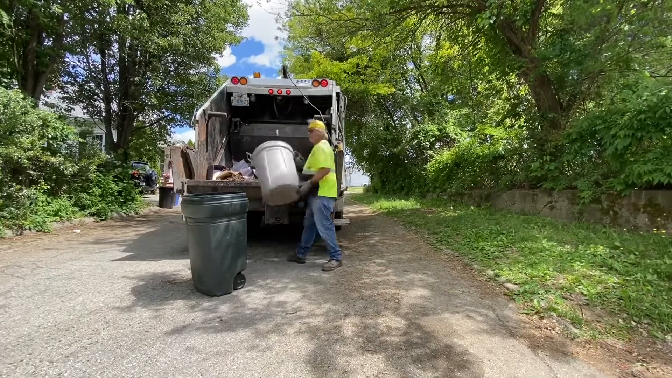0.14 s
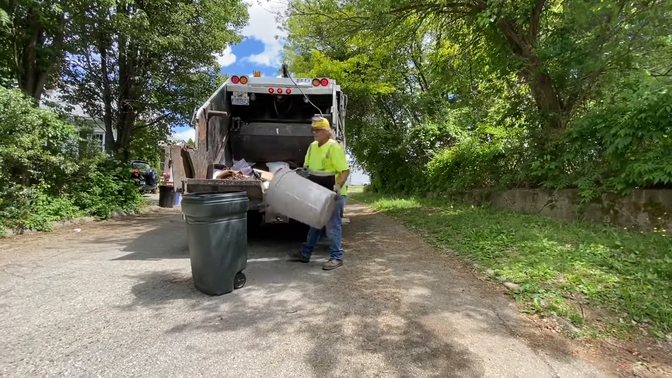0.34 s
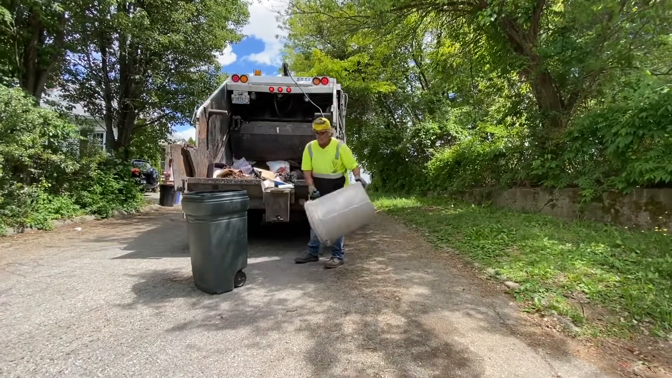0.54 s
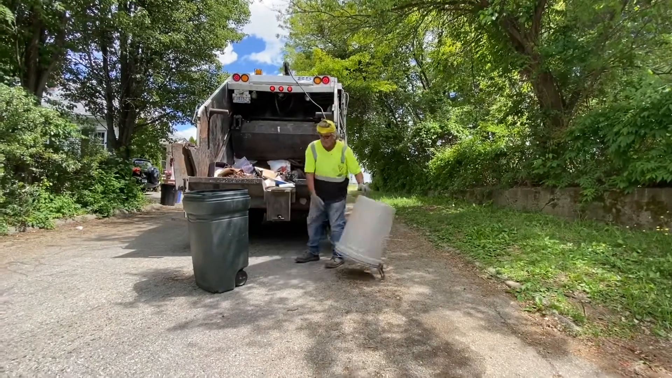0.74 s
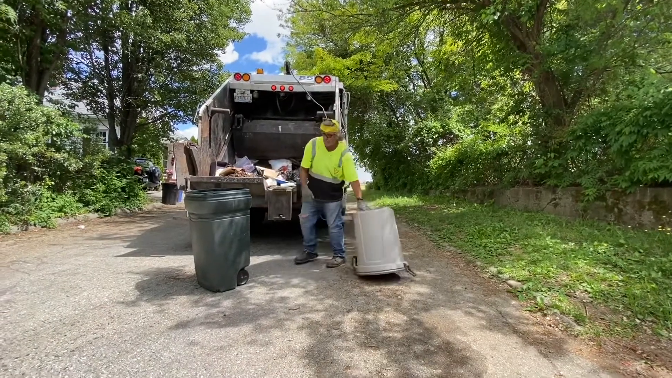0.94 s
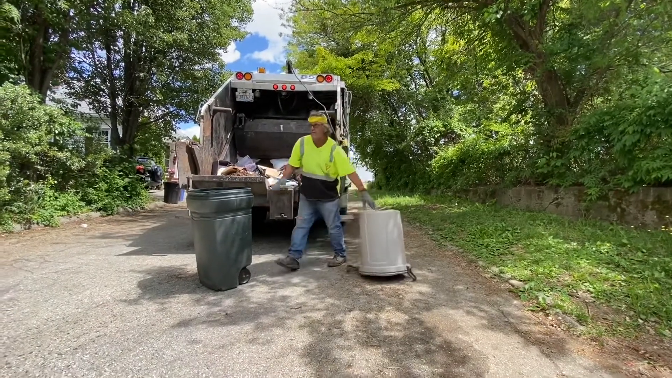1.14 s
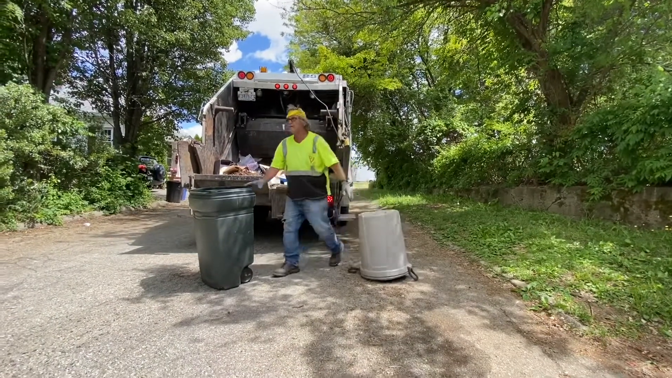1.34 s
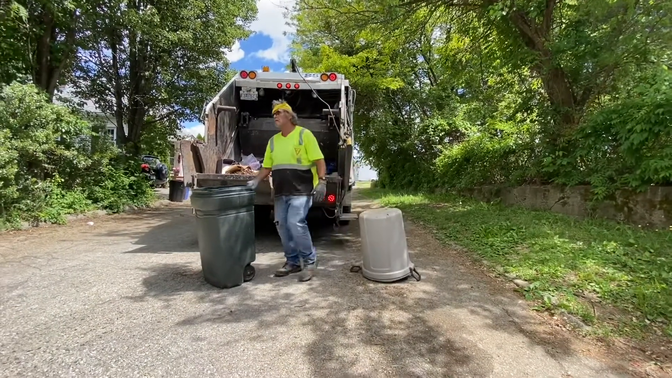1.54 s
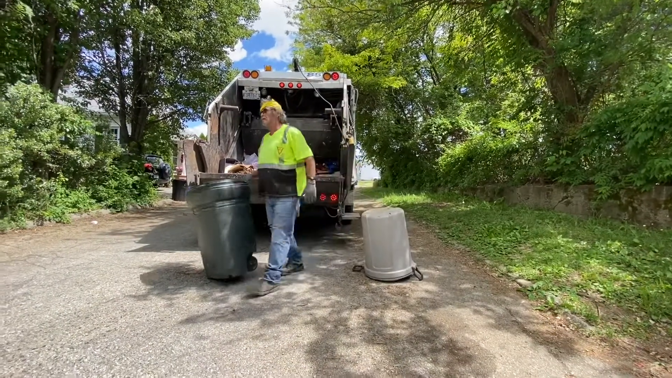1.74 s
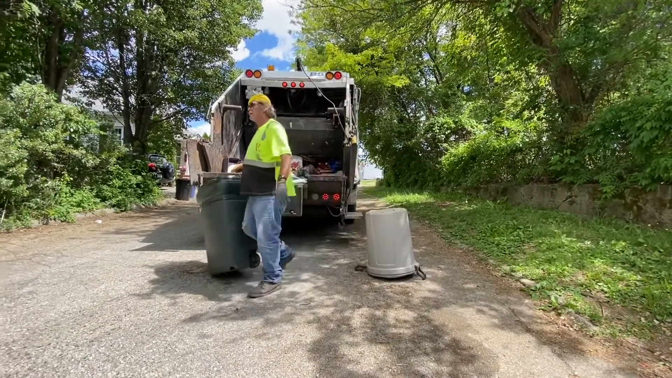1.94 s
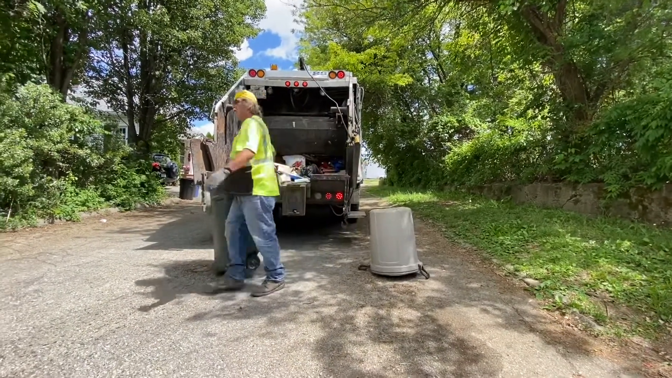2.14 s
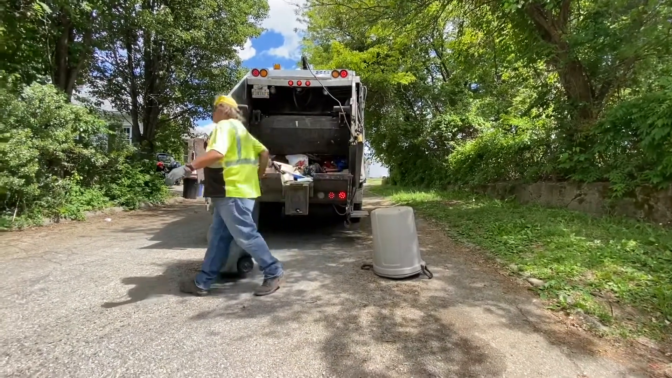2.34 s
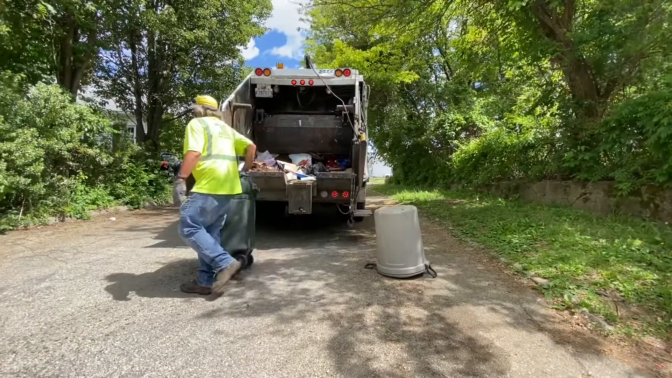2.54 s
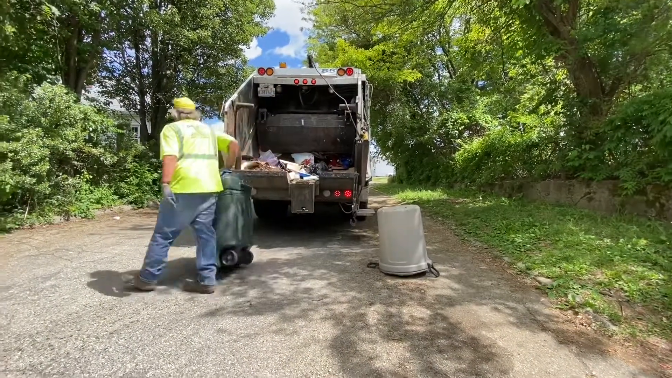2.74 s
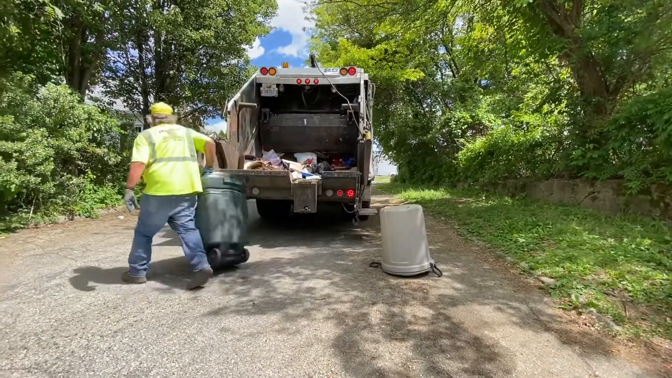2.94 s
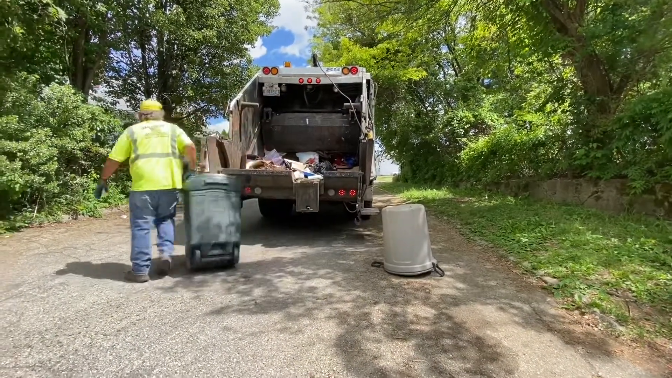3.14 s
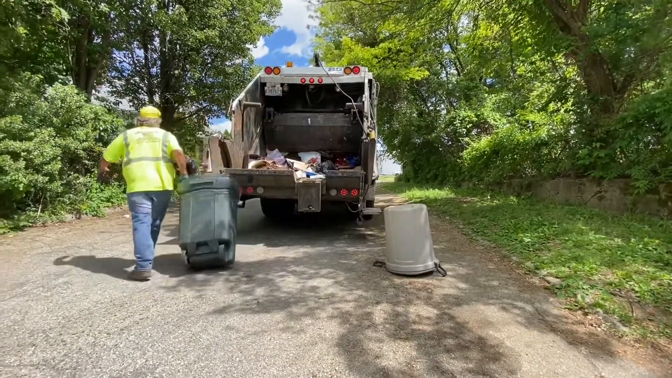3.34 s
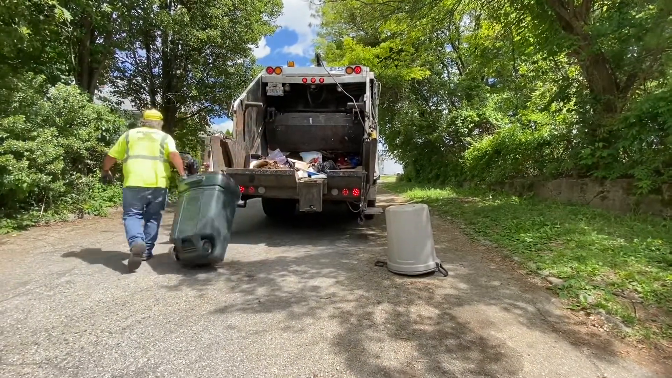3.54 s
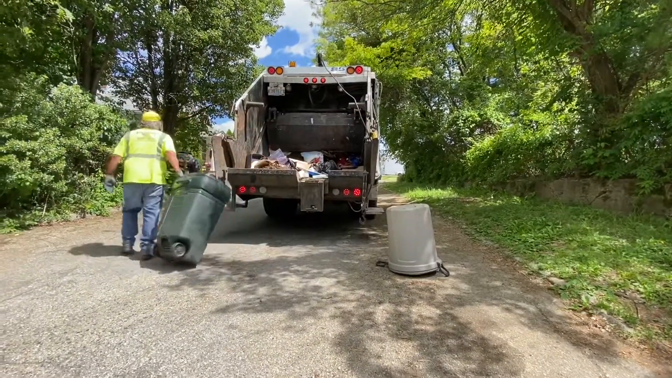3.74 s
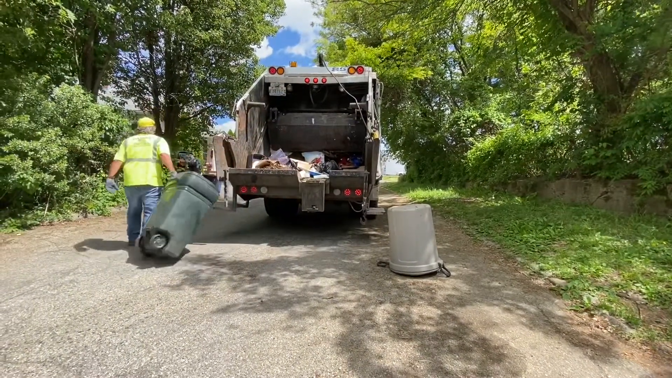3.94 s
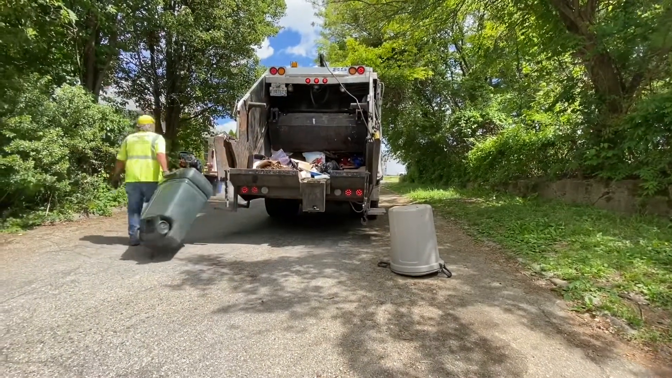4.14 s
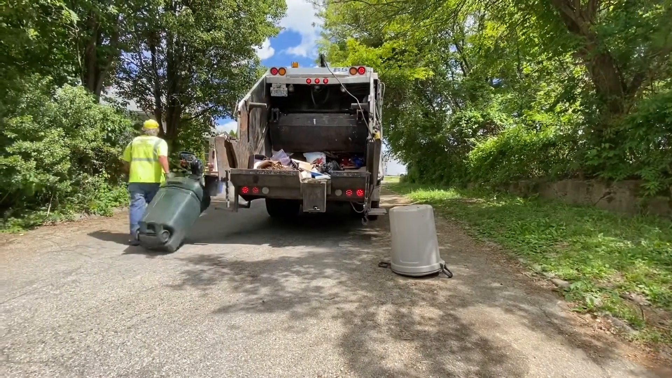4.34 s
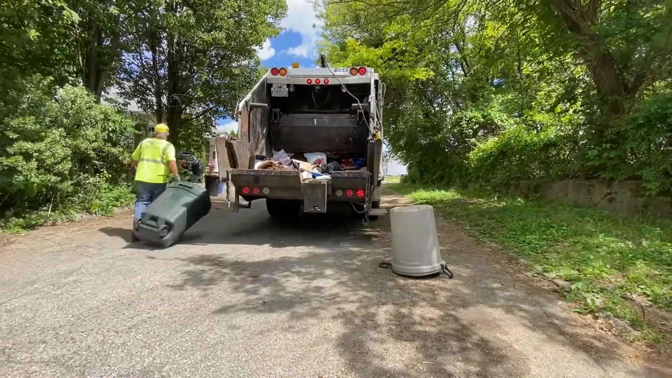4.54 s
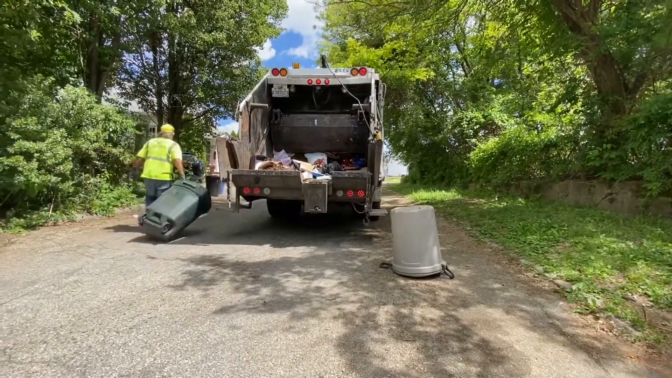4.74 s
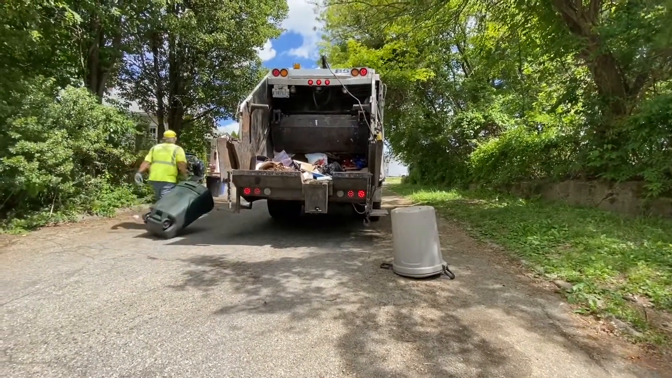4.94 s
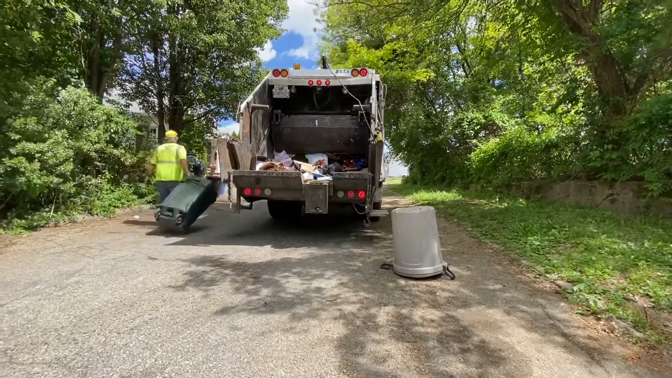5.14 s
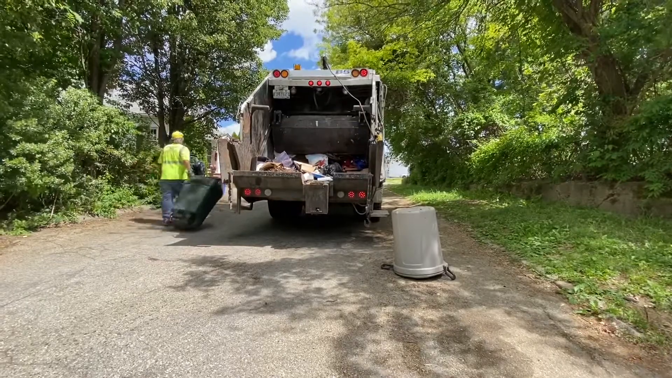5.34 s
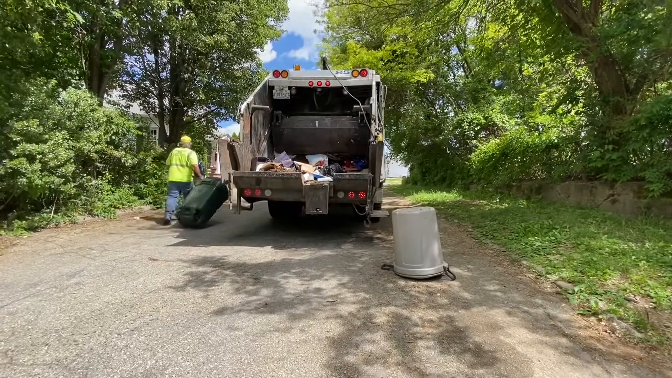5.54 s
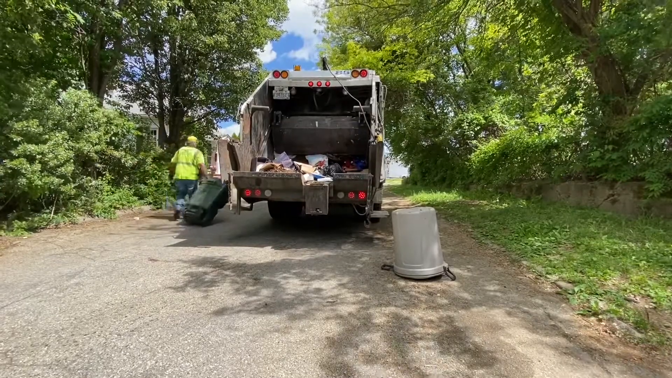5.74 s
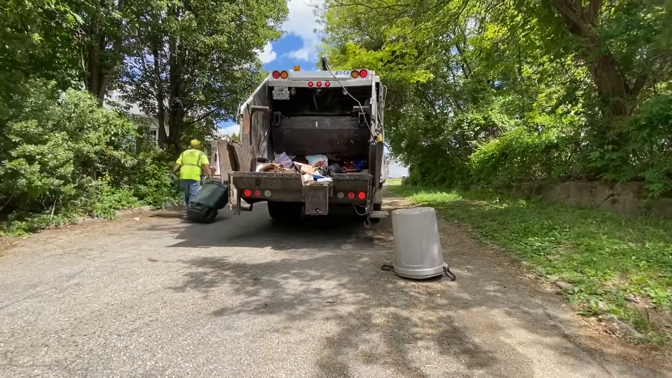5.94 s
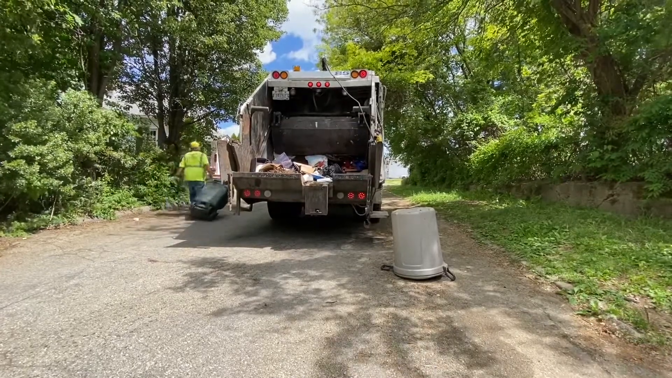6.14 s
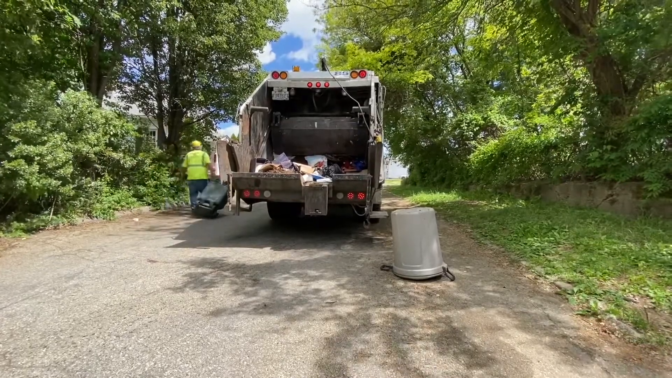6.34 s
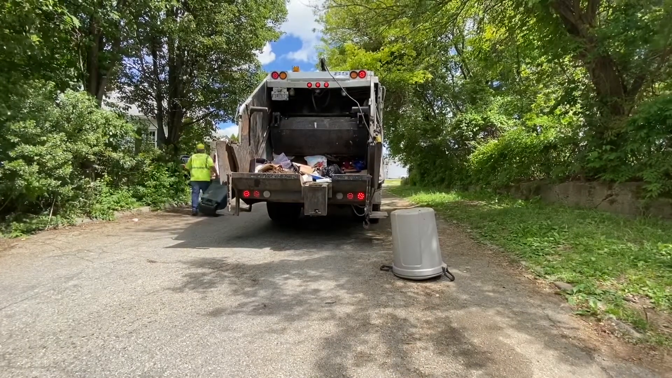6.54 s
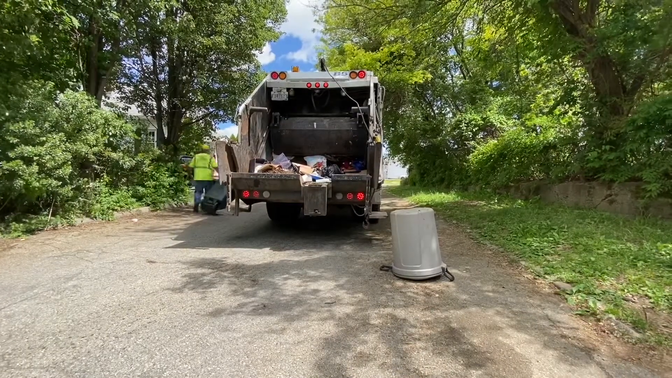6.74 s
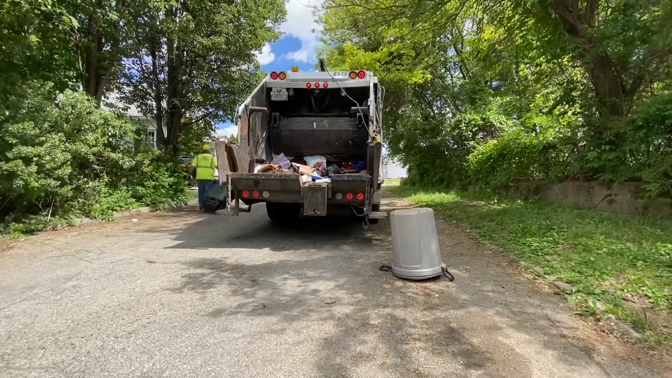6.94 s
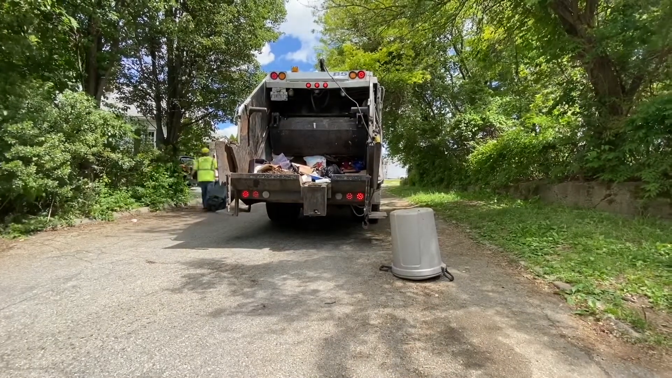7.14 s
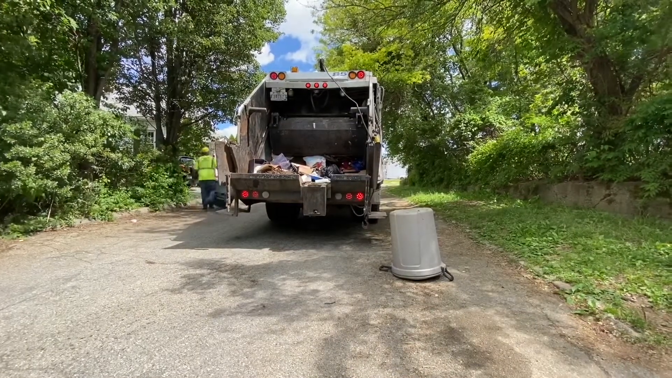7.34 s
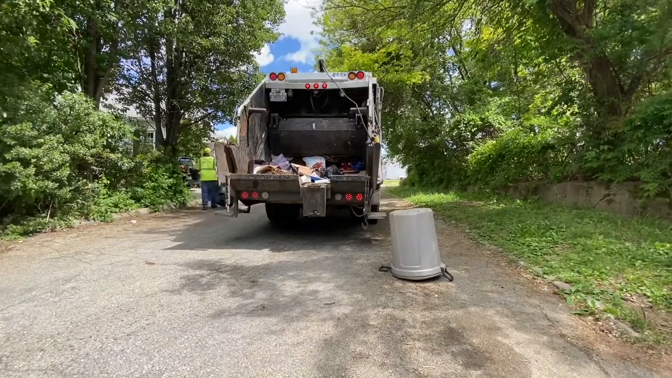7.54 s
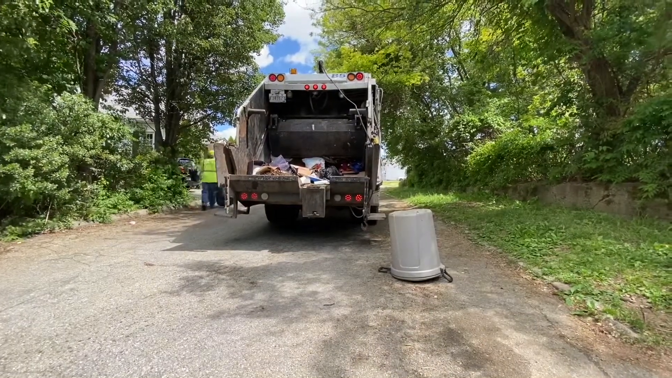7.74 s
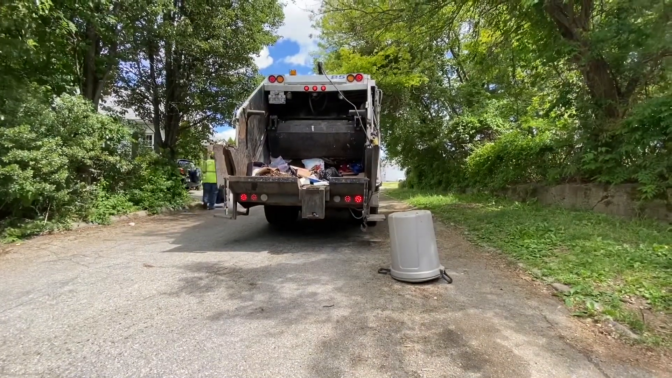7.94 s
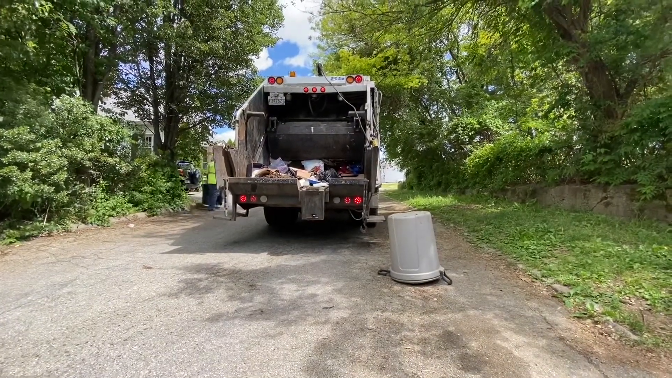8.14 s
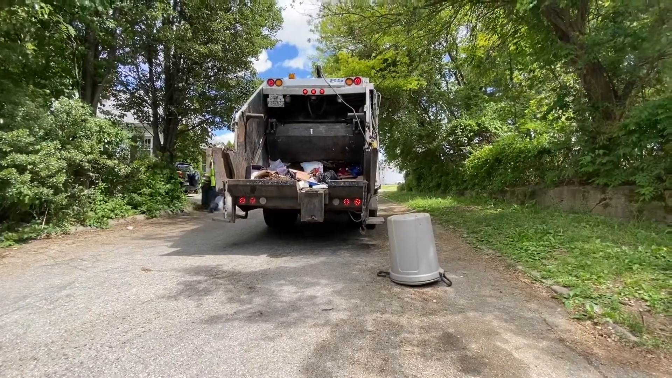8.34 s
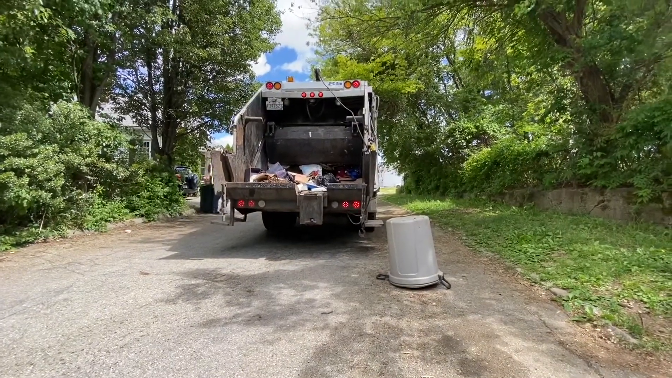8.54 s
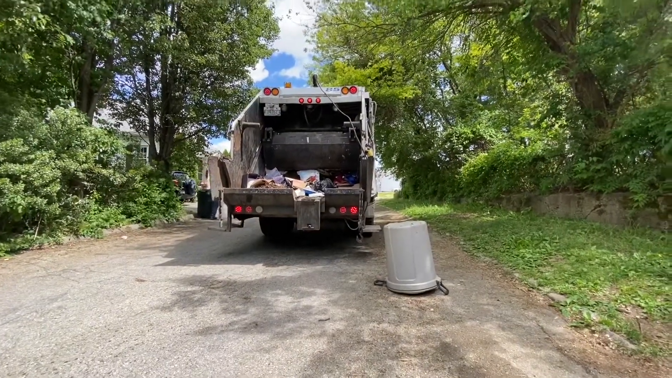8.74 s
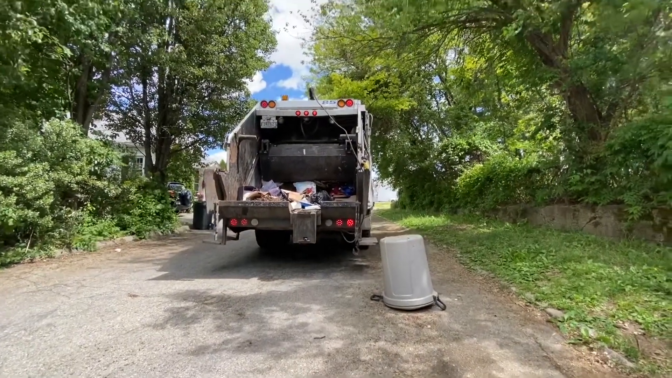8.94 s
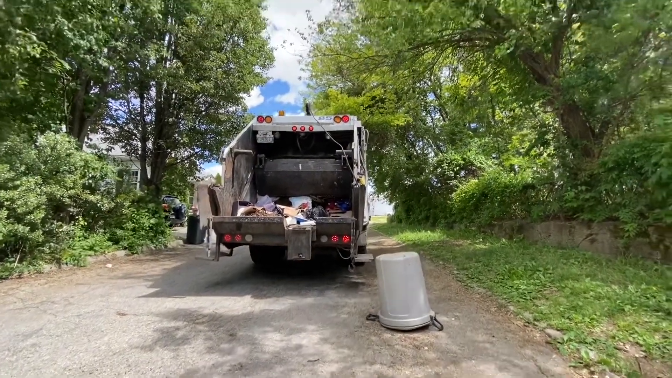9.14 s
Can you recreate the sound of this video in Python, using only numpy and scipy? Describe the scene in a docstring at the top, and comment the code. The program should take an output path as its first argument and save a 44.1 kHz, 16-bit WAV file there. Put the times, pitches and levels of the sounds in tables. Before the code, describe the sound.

Steady truck idle, low pump hum and soft wind rumble run throughout. First a hollow plastic can hits the ground and bounces, loud and close to centre. After light scrapes and grit, a wheeled plastic bin drums and thumps away leftward over rough asphalt, knocks ringing metal near seven seconds, and ends with light lid clacks. Handheld stereo microphone outdoors, short diffuse street echo, low wind thumps.

```python
"""A refuse truck idles in a tree-lined street: diesel knock, fan roar and the hum of its hydraulic pump.
An empty plastic can is dropped and bounces; a wheeled bin is dragged over rough asphalt, bumping,
and knocks the truck's side. Grit and bin give short bright snaps; light wind buffets two microphone ports
over a low rumble. Noise shaped in colour and level makes roar, wind, rumble and grit; sine waves make the
hum, exhaust and low thumps; short pushes of noise ring the resonances of can, bin and truck."""
import sys
import numpy as np
from scipy import signal
from scipy.fft import rfft, irfft, next_fast_len
from scipy.io import wavfile
from scipy.ndimage import map_coordinates

SR = 44100
rng = np.random.default_rng(int(sys.argv[2]) if len(sys.argv) > 2 else 0)


def wav_record(signal):
    """Record a signal, one row per channel, as 16-bit PCM in the file named by sys.argv[1]."""
    frames = np.transpose(np.atleast_2d(signal))
    bounded = np.clip(frames, -1, 1)
    # unit amplitude maps onto the largest positive 16-bit level
    quanta = np.round(bounded * 32767).astype(np.int16)
    wavfile.write(sys.argv[1], SR, quanta)


def nominal_scale(level):
    """Amplitude ratio for a level in decibels (scalar or array-like)."""
    x = np.asarray(level, float) / 20
    return 10 ** x


N = 409248
T = np.arange(N) / SR  # seconds
HALVES = np.array([[.5], [-.5]])  # shares a left-right difference between the two ports


def unit(x):
    """Scales a signal to rms 1."""
    return x / np.sqrt(np.mean(x ** 2) + 1e-20)


def along(points, hz):
    """Reads a curve of (pitch_hz, value) points on a log frequency axis."""
    f, v = np.transpose(points)
    return np.interp(np.log(hz + 1), np.log(f + 1), v)


def curves(rows):
    """One value per sample for each column after the time; -120 (next to silence) outside the rows."""
    s, *cols = np.transpose(rows)
    return [np.interp(T, s, c, left=-120, right=-120) for c in cols]


def wobble(rate):
    """A smooth random curve with rate random points a second."""
    return map_coordinates(rng.standard_normal(int(N * rate / SR) + 4), [T * rate])


def filtered(x, response):
    """Multiplies the spectrum of x by a complex response of frequency."""
    m = next_fast_len(N + SR // 2)
    return irfft(rfft(x, m) * response(np.fft.rfftfreq(m, 1 / SR)), m)[..., :N]


def ringing(modes):
    """Response of a body with (pitch_hz, width_hz, level_db) resonances, of alternating sign."""
    def response(f):
        total = 0
        for k, (centre, width, db) in enumerate(modes):
            resonance = 1j * f * width / (centre * centre - f * f + 1j * f * width)
            total = total + (-1) ** k * nominal_scale(db) * resonance
        return total
    return response


def rush(gain, alike):
    """Stereo noise of rms 1 with a colour and a likeness between channels."""
    def response(hz):
        turn = np.arccos(np.clip(along(alike, hz), -1, 1)) / 2
        return gain(hz) * [np.cos(turn), np.sin(turn)]
    mid, side = filtered(rng.standard_normal((2, N)), response)
    return unit(np.array([mid + side, mid - side]))


def lumps(depth_db):
    """Random swings in level, separate for each port."""
    return nominal_scale(depth_db * np.array([wobble(12), wobble(12)]))


def bursts(times, dbs, t60s, attack):
    """Summed envelopes that rise fast and die away."""
    t = T[:SR // 2]
    out = np.zeros(N + SR)
    for s, db, t60 in zip(times, dbs, t60s):
        fade = nominal_scale(db - 60 * t / max(t60, .004))
        out[round(s * SR):][:len(t)] += fade * (1 - np.exp(-t / attack))
    return out[:N]


def add(out, times, sounds):
    """Lays each sound into out at its time."""
    for s, sound in zip(times, sounds):
        out[..., round(s * SR):][..., :sound.shape[-1]] += sound


# How far the left port leads for a source far left: pitch_hz, lead_radians
LEFT_LEAD = [(100, 0.097), (700, 1.72), (2000, 2.88), (4500, 7.36), (7500, 6.36), (12000, 6.4)]


def placed(x, left_db, leftness):
    """Puts a source to one side by level and time; positive values make the left louder and earlier."""
    def response(hz):
        return nominal_scale(left_db * HALVES) * np.exp(1j * leftness * along(LEFT_LEAD, hz) * HALVES)
    return filtered(x, response)


def struck(shell, knocks, soft=(), rim_db=0):
    """Each contact snaps, raps the rim, drums the wall and booms in the hollow; soft ones swell slowly.

    rim_db is the rim's level over the mean of snap and wall."""
    out = np.zeros(N + SR)
    t, f = T[:2 ** 14], np.fft.rfftfreq(2 ** 15, 1 / SR)
    for rows, slowness, crack in [(knocks, 1, 2.5), (soft, 6, .3)]:
        if not len(rows):
            continue
        s, snap_db, wall_db, boom_db, t60 = np.transpose(rows)[:, :, None]
        middle_db = (snap_db + wall_db) / 2
        # level_db, share of t60, attack_s (times slowness), share of crack
        parts = [(boom_db, 1.5, .008, .1), (wall_db, .9, .002, .5),
                 (middle_db + rim_db, .8, .0015, .6), (snap_db, .6, .0004, 1.3)]
        for modes, (db, share, attack, hard) in zip(shell, parts):
            fade = nominal_scale(-60 * t / (share * t60)) + hard * crack * np.exp(-t / 0.0011)
            push = fade * (1 - np.exp(-t / (slowness * attack)))
            # random stretches of one wobble make each contact uneven
            starts = rng.integers(N - len(t), size=(len(rows), 1))
            uneven = nominal_scale(2.16 * wobble(300)[starts + np.arange(len(t))])
            noise = rng.standard_normal(push.shape) * uneven
            body = ringing(modes)(f) / (1 + 1j * f / (1.64 * modes[-1][0])) ** 2
            ring = irfft(rfft(noise * push, 2 * len(t)) * body)[:, :len(t)]
            # the blow sets the energy, whatever the body passes
            energy = np.linalg.norm(push, axis=1) / np.linalg.norm(ring, axis=1)
            add(out, s[:, 0], nominal_scale(db) * energy[:, None] * ring)
    return out[:N]


# How fast the street's echo dies: pitch_hz, t60_s
STREET_DECAY = [(100, 0.32), (1000, 0.15), (10000, 0.23)]


def street(x):
    """Trees, kerb and truck scatter a short, diffuse tail: noise whose pitches fade at their own rates."""
    hz, t, z = signal.stft(rng.standard_normal((2, SR // 2)), SR, nperseg=256)
    fade = nominal_scale(-60 * t / along(STREET_DECAY, hz)[:, None])
    tail = signal.istft(z * fade, SR, nperseg=256)[1]
    delayed = np.pad(x, ((0, 0), (300, 0)))  # samples
    return signal.fftconvolve(delayed, tail / np.linalg.norm(tail[0]), axes=1)[:, :N]


# Strength of the wind's buffeting: start_s, level_db before random swings
WIND_STRENGTH = [(0, -30), (0.6, -31.5), (1.0, -28.5), (2.0, -30), (2.35, -29.5), (2.84, -32.5),
                 (3.7, -28.5), (4.4, -31), (5.3, -24.5), (5.7, -25.5), (6.05, -30.5), (6.3, -30),
                 (6.7, -26.5), (7.0, -27), (7.7, -26.5), (7.96, -32.5), (8.8, -41.5), (9.28, -32.5)]
# Colour of the buffeting: pitch_hz, relative level_db
BUFFET_COLOUR = [(12, -42), (20, -19.5), (65, -1), (87, -6), (129, -2), (150, -34.5), (200, -29),
                 (330, -120)]
# Colour of the low rumble, strongest at 130-300 Hz: pitch_hz, relative level_db
RUMBLE_COLOUR = [(90, -39), (130, 9.5), (200, 2), (300, -5), (450, -12.5), (900, -76)]


def wind_and_rumble():
    """Eddies buffet each port almost on its own; a low rumble at 130-300 Hz lies under the scene."""
    buffet_db = curves(WIND_STRENGTH)[0] + 1 * wobble(5.2)
    buffet = rush(lambda hz: nominal_scale(along(BUFFET_COLOUR, hz)), [(60, 0.016)])
    buffet = unit(lumps(depth_db=1.0) * buffet)
    rumble = rush(lambda hz: nominal_scale(along(RUMBLE_COLOUR, hz)), [(200, 0.46)])
    rumble = unit(lumps(depth_db=3.0) * rumble)
    rumble_db = -39 + 0.43 * (buffet_db - buffet_db.mean())  # shares part of the buffet's swing
    return nominal_scale(buffet_db) * buffet + nominal_scale(rumble_db) * rumble


# Low thumps, likely eddies on a port: start_s, level_db, left_minus_right_db, mean pitch_hz
PORT_THUMPS = [(1.803, -16, 12, 99), (7.102, -15, -2, 142.4), (7.142, -10.5, 18, 73.4),
               (7.212, -7, 1, 75.4), (7.525, -5.5, -3, 121), (7.634, -9.5, 5, 66.6),
               (7.737, -15.5, 21, 96.9)]


def thumps():
    """A bursting eddy pushes mostly one port: a few low cycles, tuned a little apart at the two ports."""
    out, t = np.zeros((2, N + SR)), T[:SR // 4]
    draws = rng.standard_normal((len(PORT_THUMPS), 2, 1))
    for (s, db, pan_db, hz), draw in zip(PORT_THUMPS, draws):
        envelope = nominal_scale(db + pan_db * HALVES - 60 * t / 0.14) * (1 - np.exp(-t / 0.017))
        cycles = np.sin(2 * np.pi * hz * (1 + 0.085 * draw) * t)
        add(out, [s], [envelope * cycles])
    return out[:, :N]


# Hum of the hydraulic pump: start_s, pitch_hz, mean level_db
PUMP_HUM = [(0, 161.3, -33), (1, 161.5, -34), (2.3, 160, -31), (3.4, 161.4, -31.5), (5, 160.6, -32),
            (6.5, 160.9, -32), (8, 160.1, -33), (9.28, 162.2, -34)]
# Its faint overtones: multiple of the hum's pitch, mean level_db relative to the hum
HUM_OVERTONES = [(2, -28), (3, -22.5), (6, -54), (9, -27.5)]


def pump():
    """The pump's rotation gives a steady hum with faint overtones, a little louder on the right."""
    hz, db = curves(PUMP_HUM)
    turn = 2 * np.pi * np.cumsum(hz) / SR
    overtones = sum(nominal_scale(level + 1.6 * wobble(6.4)) * np.sin(k * turn) for k, level in HUM_OVERTONES)
    level = np.sqrt(2) * nominal_scale(db + 0.74 * wobble(5.6))
    return level * (np.sin(turn) + overtones) * nominal_scale([[-1.2], [1.2]])


# Exhaust tones: multiple of the firing rate, mean level_db
EXHAUST_TONES = [(1, -62), (2, -74), (3, -47)]
# Knock of each cylinder in turn: relative level_db
CYLINDER_KNOCKS = [-0.5, 1.6, 1.5, -0.54, 2, 0]
# A tappet that clacks once an engine cycle: start_s, pitch_hz, width_hz, level_db
TAPPET_CLACK = (.001, 1400, 110, -54)
# Colour of the engine and fan roar: pitch_hz, relative level_db
ROAR_COLOUR = [(35, -42), (60, -41), (130, -17.5), (210, -20.5), (330, -27.5), (450, -16.5), (700, -23),
               (1000, -27.5), (2000, -26.5), (3500, -31), (5000, -35), (5700, -41.5), (11500, -50.5),
               (16000, -44)]
# Resonances of the truck's body panels: pitch_hz, width_hz, level_db over the roar
BODY_PANELS = [(553, 156, 5.5), (812, 73, 8.5), (1115, 128, 12), (1406, 59, 10.5), (1767, 190, 5.5),
               (2367, 95, 5), (4635, 500, 8.5), (6700, 400, 8.5), (8800, 1700, 6.5)]
# Likeness of the roar at the two ports: pitch_hz, likeness (0 to 1)
ROAR_LIKENESS = [(100, 0), (300, 0.25), (700, 0.32), (1500, 0.07), (3000, 0), (7000, 0.2), (15000, 0.16)]


def engine():
    """Every firing puffs the roar, coloured by the panels; exhaust tones hum and one tappet clacks."""
    firing_hz = 37.635
    firing = firing_hz * T + 0.042 * wobble(3)  # firings so far
    cylinder_db = np.take(CYLINDER_KNOCKS, firing.astype(int) % len(CYLINDER_KNOCKS))
    knock = nominal_scale(cylinder_db) * np.exp(-(firing % 1) / 1.1)

    def colour(f):
        panels = sum((nominal_scale(db) - 1) / (1 + (2 * (f - c) / w) ** 2) for c, w, db in BODY_PANELS)
        return nominal_scale(along(ROAR_COLOUR, f)) * (1 + panels)
    roar = rush(colour, ROAR_LIKENESS)
    roar = nominal_scale(-36 + 0.6 * wobble(5.6)) * unit(roar * (1 + 0.37 * knock))
    exhaust = sum(nominal_scale(db + 3.6 * wobble(7.2)) * np.sqrt(2) * np.sin(2 * np.pi * k * firing)
                  for k, db in EXHAUST_TONES)
    first, hz, width, db = TAPPET_CLACK
    since = (T - first) % (len(CYLINDER_KNOCKS) / firing_hz)  # seconds since the last clack
    taps = rng.standard_normal(N) * np.exp(-since / .012)
    clack = filtered(taps, ringing([(hz, width, 0)]))
    return roar + exhaust + nominal_scale(db) * unit(clack)


# Short bright snaps of grit, and of the bin at 3.85 and 4.51 s:
# start_s, snap level_db, snap pitch_hz, body level_db
BRIGHT_SNAPS = [(0.32, -41, 8950, -45), (1.0685, -42, 10000, -43), (1.3294, -38.5, 7500, -65),
                (1.4035, -51, 12000, -58), (1.4815, -45, 10000, -46), (1.4955, -45, 10000, -55),
                (1.578, -42, 8900, -31), (1.8397, -43, 10300, -41), (1.9889, -44, 11000, -48),
                (2.113, -36, 6600, -39), (2.156, -36.5, 6500, -44), (2.3275, -48, 9000, -33),
                (2.3417, -35.5, 10800, -50), (2.859, -49, 9000, -28), (3.052, -45, 9000, -42),
                (3.2294, -49, 9000, -46), (3.8523, -19.5, 4000, -43), (4.5138, -32, 3560, -43),
                (6.2885, -37, 10500, -45), (6.9705, -32, 6500, -48), (7.0236, -33.5, 6400, -50),
                (7.6353, -27, 6500, -44)]
# Colour of grit: pitch_hz, relative level_db
GRIT_COLOUR = [(880, -35), (1500, -23), (1900, 2), (2660, -5.5), (4160, -2.5), (6060, -7), (6560, -8),
               (11500, -18.5), (16000, -19)]
# When the bin is pulled from the middle to the left: start_s, end_s
BIN_LEAVES = (3.25, 3.55)


def bright_snaps():
    """Grit, and twice the bin, snaps: each snap has its own bright pitch over a broad crack."""
    s, db, hz, body_db = np.transpose(BRIGHT_SNAPS)
    t, out = T[:2048], np.zeros(N + SR)
    f = np.fft.rfftfreq(2 * len(t), 1 / SR)
    colour = ringing([(hz[:, None], 0.1 * hz[:, None], 0)])(f) + 0.16 * (f > 4500)
    envelope = nominal_scale(-60 * t / 0.026) * (1 - np.exp(-t / 0.00068))
    push = rng.standard_normal((len(s), len(t))) * envelope
    snaps = irfft(rfft(push, 2 * len(t)) * unit(colour))[:, :len(t)]
    add(out, s, nominal_scale(db)[:, None] * snaps)
    snaps = out[:N]
    body = rush(lambda hz: (hz < 4500) * nominal_scale(along(GRIT_COLOUR, hz)), [(3000, 0.28)])
    body = body * bursts(s, body_db, 0 * s + 0.037, 0.0011)
    away = np.interp(T, BIN_LEAVES, [0, 1])
    return snaps * (1 - away) + placed(snaps * away, left_db=10.0, leftness=0.83) + body


# Knocks on the can: start_s, snap_db, wall_db, boom_db, t60_s (scaled for each part)
CAN_KNOCKS = [(0.7183, -20, -8, -16, 0.063), (0.7238, -27, -6, -6, 0.12), (0.8689, -21, -12.5, -9.5, 0.14),
              (0.9814, -22, -22.5, -22, 0.17)]
# Softer-starting contacts of the can, same columns
CAN_SOFT = [(0.805, -23, -7, -4, 0.15), (0.8155, -17, -16, -6, 0.16), (0.9272, -19, -14, -12.5, 0.15),
            (0.9449, -21.5, -19, -21, 0.17)]
# The can's resonances, grouped as boom, wall, rim, snap: pitch_hz, width_hz, relative level_db
CAN_BODY = [
    [(108, 61, 1.5), (192, 68, 3)],
    [(472, 74, 3), (763, 77, 3.5), (873, 83, 2), (1133, 80, 1)],
    [(1380, 850, 4.5), (2300, 1700, 2)],
    [(3730, 510, -0.5), (4900, 2200, -11), (6450, 330, -3.5), (8250, 1300, -12.5), (11000, 3200, -15)],
]


def plastic_can():
    """The dropped empty can bounces: its shell and hollow ring at each contact."""
    bounces = struck(CAN_BODY, CAN_KNOCKS, CAN_SOFT, rim_db=-0.5)
    return placed(bounces, left_db=-1.0, leftness=-0.23)


# Knocks on the truck's side: start_s, snap_db, wall_db, boom_db, t60_s (scaled for each part)
TRUCK_KNOCKS = [(6.9038, -26, -22, -15, 0.07), (6.9165, -35, -16, -20, 0.11),
                (6.9293, -34, -17.5, -24, 0.18), (7.0692, -64, -26.5, -20.5, 0.1)]
# Softer-starting contacts with it, among them the loud first part of the bang, same columns
TRUCK_SOFT = [(6.877, -33, -36, -16, 0.17), (6.9051, -13.5, -2.5, -13, 0.078)]
# The side's resonances, grouped as boom, wall, rim, snap: pitch_hz, width_hz, relative level_db
TRUCK_BODY = [
    [(168, 33, 0)],
    [(358, 31, 0.5), (538, 11, 10), (664, 130, -11.5), (1054, 48, 2.5)],
    [(1560, 260, 2), (1950, 230, 6), (2710, 750, -3.5)],
    [(3070, 130, 0), (3480, 95, 6), (4270, 1000, -1.5), (7040, 2800, -19)],
]


def truck_side():
    """The bin knocks the truck's side, which rings at its own resonances."""
    knocks = struck(TRUCK_BODY, TRUCK_KNOCKS, TRUCK_SOFT, rim_db=6)
    return placed(knocks, left_db=-0.5, leftness=0.29)


# Four passages: can tipped out, bin pulled round, bin wheeled away, bin parked.
# Rows of each: start_s, drumming level_db, grit level_db
DRAG_PASSAGES = [
    [(0.2, -55, -52), (0.55, -61, -50)],
    [(1.5, -47, -57), (1.72, -69, -58), (1.9, -45.5, -48), (2.0, -52, -68)],
    [(3.1, -49, -63), (3.67, -54, -56), (3.79, -38, -43), (3.98, -64, -87), (4.4, -57, -67),
     (4.68, -36, -43), (4.9, -35.5, -48.5), (5.17, -55.5, -74), (5.33, -37, -61), (5.5, -45, -72),
     (5.79, -36.5, -34.5), (6.04, -36.5, -53), (6.24, -45.5, -47), (6.4, -36, -41.5), (6.64, -42, -56),
     (7.05, -36.5, -62), (7.34, -45, -57), (7.71, -45, -42), (7.9, -47, -88)],
    [(8.22, -40.5, -61), (8.3, -35, -61), (8.44, -42.5, -59), (8.5, -48.5, -54), (8.95, -49, -55)],
]
# The bin's resonances, grouped as boom, wall, rim, snap: pitch_hz, width_hz, relative level_db
BIN_BODY = [
    [(115, 61, 10), (217, 340, -10)],
    [(418, 120, -5), (545, 92, 1.5), (823, 114, -5), (904, 64, 1), (1085, 210, -5)],
    [(1460, 270, 5), (1930, 240, 6.5), (2770, 1300, -0.5)],
    [(3560, 770, 9.5), (4070, 1350, 10.5), (4840, 1200, 7), (6500, 380, 3), (8170, 1300, -1.5),
     (11000, 2700, -7)],
]


def drag():
    """Wheels and rim chatter over the asphalt: the bin drums and rumbles, grit crunches in clumps."""
    drum_db, grit_db = np.max([curves(rows) for rows in DRAG_PASSAGES], axis=0)
    chatter = rng.standard_normal(N) * nominal_scale(3.5 * wobble(25))
    drum = unit(filtered(chatter, ringing(BIN_BODY[1])))
    rolling = rng.standard_normal(N) * nominal_scale(2.0 * wobble(15))
    rumble = unit(filtered(rolling, ringing([(184, 52, 0)])))
    grit = rush(lambda hz: nominal_scale(along(GRIT_COLOUR, hz)), [(3000, 0.31)])
    grit = unit(grit * nominal_scale(3.3 * wobble(33) + 3.3 * wobble(300)))
    rolled = nominal_scale(drum_db) * (drum + nominal_scale(4.5) * rumble)
    return placed(rolled, left_db=4.0, leftness=0.7) + nominal_scale(grit_db) * grit


# Knocks on the bin: start_s, snap_db, wall_db, boom_db, t60_s (scaled for each part)
BIN_KNOCKS = [(1.8887, -48, -24, -24, 0.059), (3.179, -56, -28.5, -20, 0.1),
              (3.6403, -33, -21.5, -23.5, 0.2), (3.8511, -23.5, -2.5, -9, 0.051),
              (3.872, -53, -18, -6.5, 0.086), (4.3019, -24.5, -21, -9.5, 0.1),
              (4.312, -47, -20.5, -15.5, 0.36), (4.5132, -32, -28.5, -24, 0.31),
              (4.6501, -38.5, -29.5, -21.5, 0.29), (5.2791, -29.5, -20.5, -11.5, 0.085),
              (5.392, -40, -23, -20, 0.3), (5.4918, -38.5, -17, -17, 0.054),
              (5.7783, -23.5, -19.5, -27, 0.087), (5.8385, -28, -30, -13, 0.06),
              (5.844, -26, -23, -24, 0.071), (6.2841, -48, -25.5, -41, 0.12),
              (8.2517, -51, -14, -15.5, 0.074), (8.3593, -48.5, -37, -16.5, 0.091)]
# Softer-starting contacts of the bin, same columns
BIN_SOFT = [(1.5998, -36, -23.5, -22, 0.15), (1.616, -24.5, -30, -17, 0.13),
            (1.64, -23.5, -19.5, -18, 0.092), (1.66, -19, -30, -25, 0.065), (3.6931, -29, -20, -31, 0.22),
            (3.7344, -27.5, -25, -25, 0.17), (3.781, -36, -22.5, -27, 0.24),
            (4.8986, -38, -12.5, -6, 0.061), (5.3267, -35, -8.5, -1, 0.057),
            (5.5627, -32, -23.5, -14, 0.13), (5.6007, -30.5, -26, -11, 0.096),
            (5.657, -27.5, -21, -15, 0.063), (5.6932, -30.5, -27, -14, 0.17), (6.0671, -36, -9, -4, 0.042),
            (6.191, -32, -16, -9.5, 0.1), (6.8433, -33, -39, -26, 0.47), (6.97, -26.5, -13.5, -22, 0.068),
            (7.0241, -43, -22.5, -36, 0.22), (7.5969, -37, -22.5, -19, 0.19), (7.634, -29, -23, -21, 0.16)]
# Clacks of handle and lid: start_s, wall_db
LID_CLACKS = [(8.5864, -28), (8.7905, -23), (8.8284, -20.5), (8.8366, -18.5), (8.8454, -26), (8.8595, -32),
              (8.891, -26.5), (9.1114, -29)]
# Shape of every clack: snap_db over the wall, boom_db over the wall, t60_s (scaled for each part)
CLACK_SHAPE = (-22.5, -30, 0.02)


def wheeled_bin():
    """The bin's hollow shell rings as it bumps along, moving left; then its handle and lid clack."""
    bumps = struck(BIN_BODY, BIN_KNOCKS, BIN_SOFT, rim_db=2.7)
    away = np.interp(T, BIN_LEAVES, [0, 1])
    near = placed(bumps * (1 - away), left_db=-0.6, leftness=0.29)
    far = placed(bumps * away, left_db=3.0, leftness=0.79)
    snap_db, boom_db, t60 = CLACK_SHAPE
    rows = [(s, db + snap_db, db, db + boom_db, t60) for s, db in LID_CLACKS]
    clacks = struck(BIN_BODY, rows, rim_db=13.5)
    return near + far + placed(clacks, left_db=4.5, leftness=0.57)  # parked beside the cab


def scene():
    """Can and bin in the echoing street over the idling truck and the wind."""
    bins = plastic_can() + wheeled_bin() + truck_side() + drag()
    background = wind_and_rumble() + thumps() + pump() + engine()
    return bins + nominal_scale(-6.5) * street(bins) + bright_snaps() + background


# Overall colour of the sound, with a narrow gap near 12.8 kHz: pitch_hz, level_db
OVERALL_COLOUR = [(20, -9), (40, -1.5), (12000, -1.5), (12800, -25), (16000, -7)]
# Difference in colour between left and right: pitch_hz, left_minus_right_db
LEFT_RIGHT_TILT = [(60, -2.5), (130, -2), (290, -4.5), (640, -0.5), (1410, -0.5), (3100, 0.5), (6820, 0),
                   (15000, -11)]


def coloured(dry):
    """Gives the whole sound its overall colour; the two ports differ a little."""
    def response(hz):
        return nominal_scale(along(OVERALL_COLOUR, hz) + along(LEFT_RIGHT_TILT, hz) * HALVES)
    return filtered(dry, response)


def top_cut(x):
    """Nothing passes above the cut-off."""
    return signal.sosfilt(signal.butter(12, 16820, fs=SR, output="sos"), x)


def record(dry):
    """The sound takes on its overall colour and the loudest peaks are rounded."""
    x = coloured(dry)
    mix = x / (1 + abs(x / .97) ** 6) ** (1 / 6)
    return top_cut(mix)


dry = scene()
out = record(dry)
wav_record(out)
```